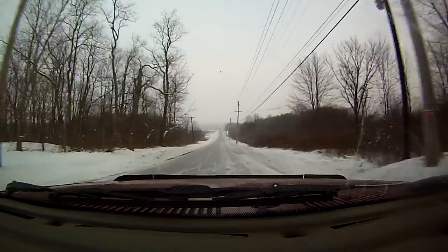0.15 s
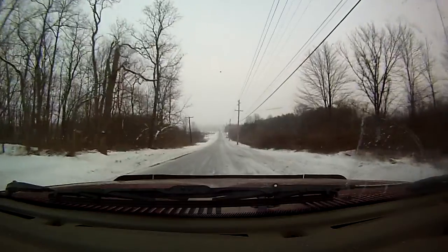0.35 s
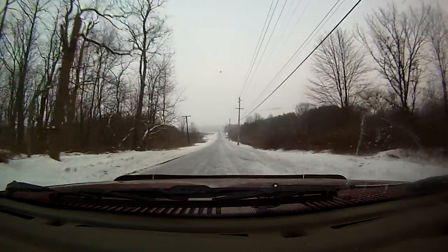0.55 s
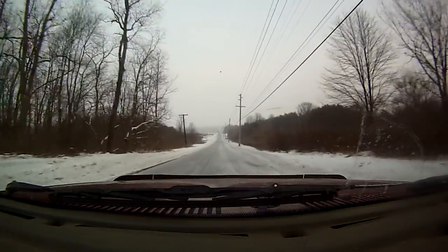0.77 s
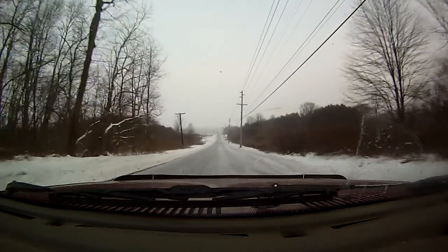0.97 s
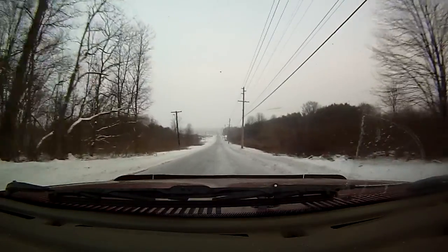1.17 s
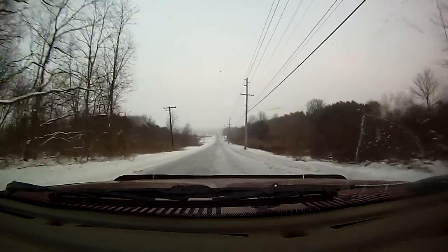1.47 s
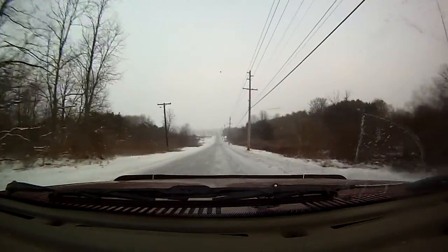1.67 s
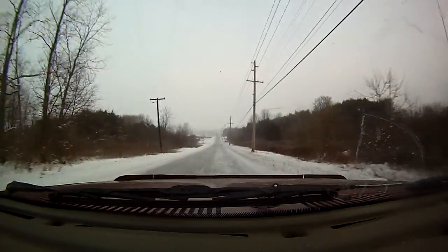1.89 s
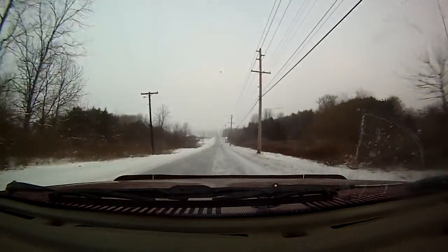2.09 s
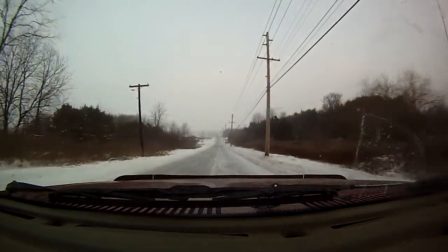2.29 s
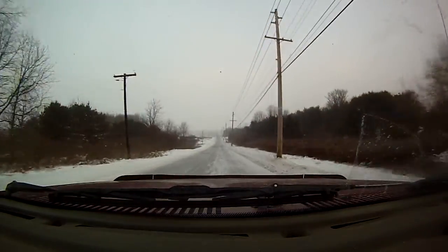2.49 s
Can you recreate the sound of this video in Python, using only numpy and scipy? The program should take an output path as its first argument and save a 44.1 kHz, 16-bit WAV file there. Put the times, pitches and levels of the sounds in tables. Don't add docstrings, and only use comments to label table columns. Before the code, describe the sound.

After a very brief silence, quickly fading in by 0.08 s, a car engine booms low and steady in the cabin, its pitch creeping up slightly until the end. Body rumble, dull tyre roar and a wavering floor hum surround it. Irregular bumps thud with tiny crackling clicks, strongest near 1.98 s; grit ticks on glass at 2.46 s. The dull camera microphone adds a faint high whine and small level dips.

```python
import sys
import numpy as np
from scipy import signal
from scipy.io import wavfile
from scipy.ndimage import uniform_filter1d, map_coordinates

SR = 44100
rng = np.random.default_rng(int(sys.argv[2]) if len(sys.argv) > 2 else 0)


def dump(signal):
    limited = np.clip(np.atleast_2d(signal).T, -1, 1)
    pcm = np.round(limited * 32767).astype(np.int16)
    wavfile.write(sys.argv[1], SR, pcm)


def magnitude_from_level(level_db):
    exponent = np.asarray(level_db, float) / 20
    return 10 ** exponent


N = 116424

# [t/s, f/Hz]
CRANK_SPEED = [
    (0, 38.07),
    (.7, 38.63),
    (2.64, 39.48),
]
# [multiple of crank speed, level/dB rms]
ENGINE_ORDERS = [
    (2, -17.5),
    (3, -25),
    (1, -47),
    (4, -40.5),
    (5, -39),
    (6, -42),
]
# [f/Hz, level/dB per Hz]
RUMBLE_SPECTRUM = [(15, -6), (30, -6), (38, -1), (48, 3), (58, -7.5), (100, -9.5), (200, -16.5),
                   (400, -29.5)]
# [f/Hz, level/dB per Hz]
ROAR_SPECTRUM = [(300, -1), (382, -8.5), (530, -6), (981, -18), (1550, -20), (1980, -27), (3200, -30),
                 (5900, -40)]
# [f/Hz, width/Hz, lift/dB]
CABIN_PANELS = [(161.5, 20, -6), (191, 58, 2.5), (319, 36.5, 4), (434.5, 21, 5), (524, 39, 5.5),
                (701, 40, 5), (859, 94, 3), (1111, 60, 6), (1417, 130, 4.5), (1575, 193, -7),
                (1616, 82, 4.5), (1970, 67, 4), (4960, 600, 4.5)]
# [t/s, surface roughness/dB, floor pan drumming/dB]
ROAD_SURFACE = [(0.101, 1.5, 6), (0.199, 0.5, -11), (.44, -2, -8), (.52, 2.5, 11), (.64, -1, -14),
                (.75, 1, -1.5), (.98, 1.5, 6.5), (1.1, 1, -1), (1.3, 0.5, 2.5), (1.45, 1.5, -1.5),
                (1.65, 1.5, 5.5), (1.82, 0.5, -10), (1.9, 1.5, -12), (2.14, 1, -9), (2.3, 1, 11),
                (2.38, 0.5, -28), (2.56, 0, 3), (2.63, 3, 5)]
# [t/s, click peak level/dB, gain step rate f/Hz, gain dip/dB]
ROAD_BUMPS = [(0.115, -52, 1960, 4), (0.388, -44, 3460, -0.5), (0.423, -39, 2780, 1.5),
              (0.5627, -38.5, 4120, 3), (0.692, -45, 2540, 0), (0.9238, -43, 2000, 3),
              (0.986, -40.5, 5400, .5), (1.012, -43, 2050, 2), (1.061, -39, 2990, 3.5),
              (1.164, -38, 1870, 2), (1.2658, -36, 3810, 3), (1.327, -40.5, 4470, 0.5),
              (1.4659, -39, 2020, 1.5), (1.538, -37.5, 2640, 3), (1.583, -39, 2690, -0.5),
              (1.6529, -39, 2260, -1.5), (1.669, -45, 2550, -0.5), (1.7432, -38, 3560, 3),
              (1.977, -33, 2590, 5), (2.049, -50, 3280, 1.5), (2.113, -36.5, 2460, 3),
              (2.252, -41, 3440, 2.5), (2.410, -40, 2790, 2.5)]
# [f/Hz, width/Hz, level/dB]
GLASS_MODES = [(3670, 220, 0.5), (4300, 220, 1), (5030, 250, -1), (5470, 220, -5)]


def evened(x, whole=None):
    whole = x if whole is None else whole
    return whole / np.sqrt(np.mean(x ** 2) + 1e-20)


def add(mix, s, sound):
    part = mix[round(s * SR):][:len(sound)]
    part += sound[:len(part)]


def drift(t, per_s):
    rates = np.geomspace(.1, 1, 24) * per_s
    return evened(sum(np.sin(2 * np.pi * (f * t + rng.random())) for f in rates))


def resonate(x, hz, width):
    turn = np.exp(2j * np.pi * hz * np.arange(len(x)) / SR)
    r = np.exp(-np.pi * width / SR)
    return 2 * (turn * signal.lfilter([1 - r], [1, -r], x / turn)).real


def engine(t):
    start_turns, waver_db, waver_per_s = .4, 0.5, 11
    turns = start_turns + np.cumsum(np.interp(t, *np.transpose(CRANK_SPEED))) / SR
    boom = np.zeros(N)
    for order, db in ENGINE_ORDERS:
        level = np.sqrt(2) * magnitude_from_level(db + waver_db * drift(t, waver_per_s))
        boom += level * np.sin(2 * np.pi * round(order) * turns)
    return boom


def body_noise(spectrum, size, patch_db, steep_db):
    frames, hz = N * 4 // size + 5, np.fft.rfftfreq(size, 1 / SR)
    a, b, patches = rng.standard_normal((frames, len(hz), 3)).T
    patches = uniform_filter1d(patches, size=6, axis=0)
    patches = evened(uniform_filter1d(patches, size=8, axis=1))
    f, level = np.transpose(spectrum)
    colour = np.interp(np.log(hz + 1), np.log(f + 1), level)
    colour = colour - steep_db * np.maximum(np.log2(f[0] / (hz + 1)), 0)
    colour = colour - 2 * steep_db * np.maximum(np.log2((hz + 1) / f[-1]), 0)
    for at, width, lift in CABIN_PANELS:
        colour = colour + lift * np.exp(-((hz - at) / width) ** 2 * 2)
    z = (a + 1j * b) * magnitude_from_level(colour[:, None] + patch_db * patches)
    return evened(signal.istft(z, nperseg=size, noverlap=size * 3 // 4)[1][:N])


def floor_pan(drumming_db):
    hz, width = 188.7, 23.4
    hum = resonate(resonate(rng.standard_normal(N), hz, width), hz, width)
    return magnitude_from_level(-35.5 + drumming_db) * evened(hum)


def tyre_tread(drumming_db):
    wander = evened(uniform_filter1d(rng.standard_normal(N), size=3000))
    hz = 319.7 + 4.985 * wander
    return magnitude_from_level(-38.5 + 0.18 * drumming_db) * np.sin(2 * np.pi * np.cumsum(hz) / SR)


def road(t):
    at, surface, drumming = np.transpose(ROAD_SURFACE)
    surface_db, drumming_db = np.interp(t, at, surface), np.interp(t, at, drumming)
    rumble_db = -24 + 1.1 * surface_db
    rumble = magnitude_from_level(rumble_db) * body_noise(RUMBLE_SPECTRUM, size=4096, patch_db=1.67, steep_db=17.0)
    roar_db = -36.5 + surface_db + 0.49 * drift(t, 40.)
    roar = magnitude_from_level(roar_db) * body_noise(ROAR_SPECTRUM, size=2048, patch_db=1.5, steep_db=11.0)
    return rumble + roar + floor_pan(drumming_db) + tyre_tread(drumming_db)


def thuds(boom):
    push_hz, push_s, lead_s = 95, 0.0026, 0.0023
    half = 800
    out, u = np.zeros(N), np.arange(-half, half) / SR
    push = np.exp(-(u / push_s) ** 2) * np.cos(2 * np.pi * push_hz * u)
    for s, _, _, dip_db in ROAD_BUMPS:
        side = np.sign(boom[round((s - lead_s) * SR)])
        add(out, s - lead_s - half / SR, side * magnitude_from_level(-19.5 + 2.06 * dip_db) * push)
    return out


def gain_dips_db(t, heard):
    fall_s, recover_s = 0.0037, 0.044
    dips_db = np.zeros(N)
    for s, _, _, dip_db in ROAD_BUMPS:
        since = np.maximum(t - s, 0)
        dips_db += abs(dip_db) * np.minimum(since / fall_s, 1) * np.exp(-since / recover_s)
    power_db = 10 * np.log10(abs(uniform_filter1d(heard ** 2, size=1300)) + 1e-9)
    return dips_db + .4 * np.maximum(power_db + 14.5, 0)


def gain_step_clicks():
    click_s, click_db, even_hz = .0024, 4.5, 4000
    out, u = np.zeros(N), np.arange(400) / SR
    swell = np.sin(np.pi * np.minimum(u / click_s, 1) ** 0.83)
    wobble = uniform_filter1d(rng.standard_normal((len(ROAD_BUMPS), 400)), size=7, axis=1)
    for (s, db, hz, _), shift in zip(ROAD_BUMPS, wobble):
        shift = shift * min(abs(even_hz - hz) / 900 + .25, 1)
        crackle = .12 * 2.6 * shift[::-1]
        steps = .5 - (hz * u + .45 * shift) % 1 + crackle
        add(out, s - click_s / 4, 2 * magnitude_from_level(db + click_db) * steps * swell)
    return uniform_filter1d(out, size=5)


def grit():
    hold_s, tail_s = 0.0063, .011
    out, u = np.zeros(N), np.arange(1500) / SR
    scrape, ring = rng.standard_normal((2, 1500))
    tick = np.zeros(1500)
    for hz, width, db in GLASS_MODES:
        mode = resonate(resonate(scrape, hz, 2 * width), hz, width)
        tick += magnitude_from_level(db) * evened(mode[:400], mode)
    tick = evened(tick) / (1 + (u / hold_s) ** 6)
    tail = magnitude_from_level(-5.5) * evened(resonate(ring, 5070, 690)) / (1 + (u / (hold_s + tail_s)) ** 8)
    attack = np.minimum(u / 0.00069, 1)
    add(out, 2.4603, magnitude_from_level(-41.5) * attack * (tick + tail))
    return out


def scene():
    t = np.arange(N) / SR
    boom = engine(t)
    return (boom + road(t) + thuds(boom) + grit())[None]


def soften_edge(x):
    edge = signal.firwin(61, 5850, window=("kaiser", 4), fs=SR)
    return signal.oaconvolve(np.pad(x, 30, "edge"), edge, "valid")


def sample_and_hold(x):
    held_rate = 12000
    low = map_coordinates(x, [np.arange(0, N + 40, SR / held_rate)], order=3, mode="nearest")
    return signal.resample_poly(np.repeat(low, 4), 147, 160)[:N]


def roll_off(x):
    return signal.sosfilt(signal.butter(12, 15340, fs=SR, output="sos"), x)


def record(dry):
    t = np.arange(N) / SR
    dips_db = gain_dips_db(t, dry[0])
    x = soften_edge(dry[0]) * magnitude_from_level(np.mean(dips_db) - dips_db)
    held = sample_and_hold(x + gain_step_clicks())
    open_at_s, open_s = 0.067, 0.017
    held = held * np.sin(np.pi / 2 * np.clip((t - open_at_s) / open_s, 0, 1)) ** 2
    return roll_off(held[None])


dry = scene()
out = record(dry)
dump(out)
```